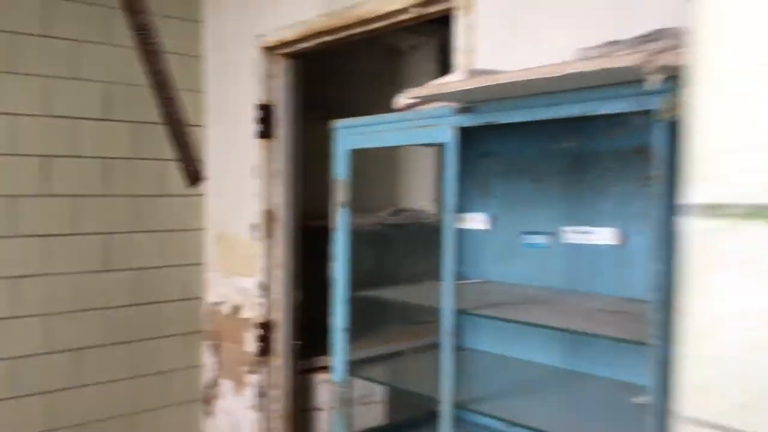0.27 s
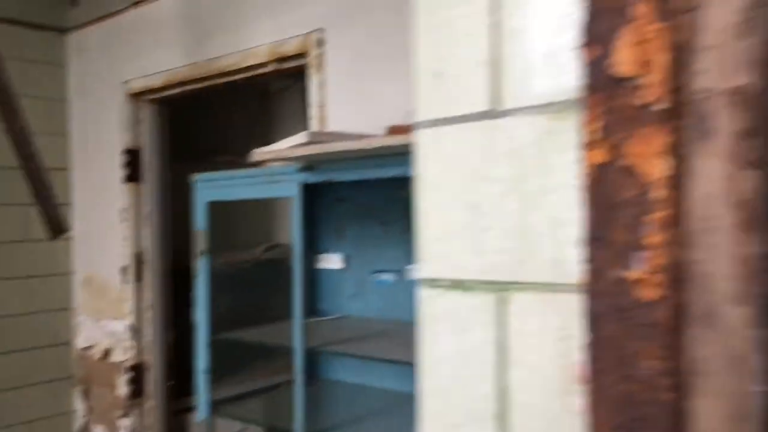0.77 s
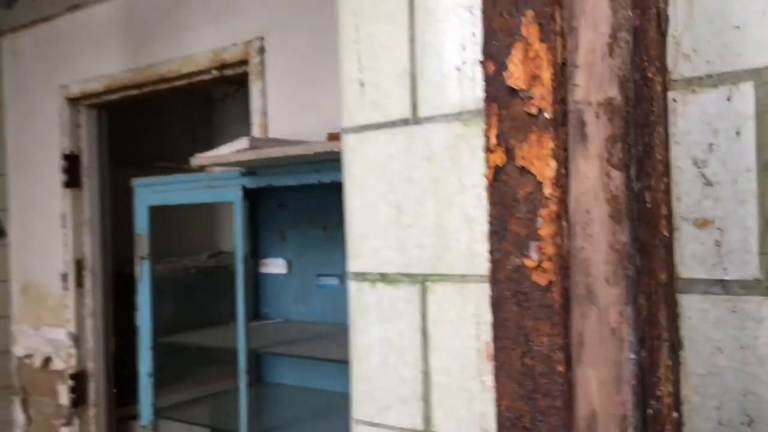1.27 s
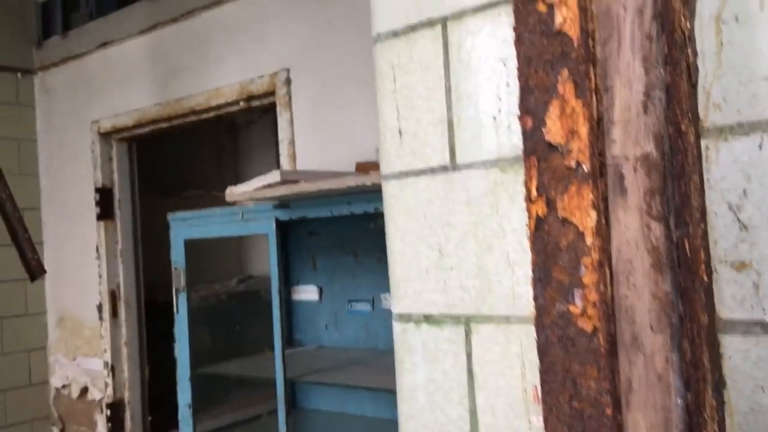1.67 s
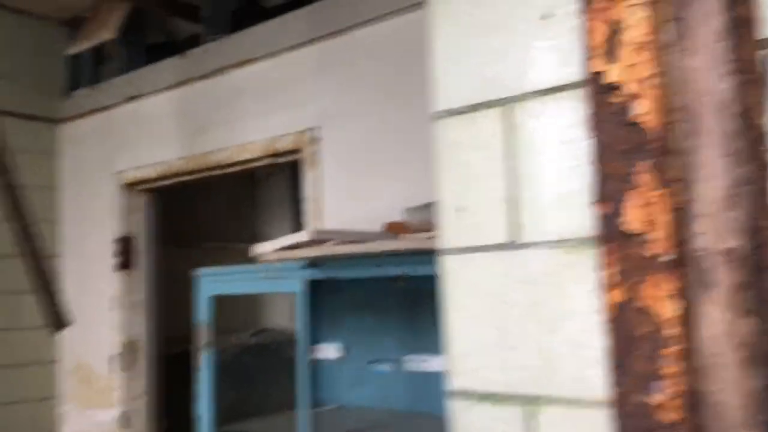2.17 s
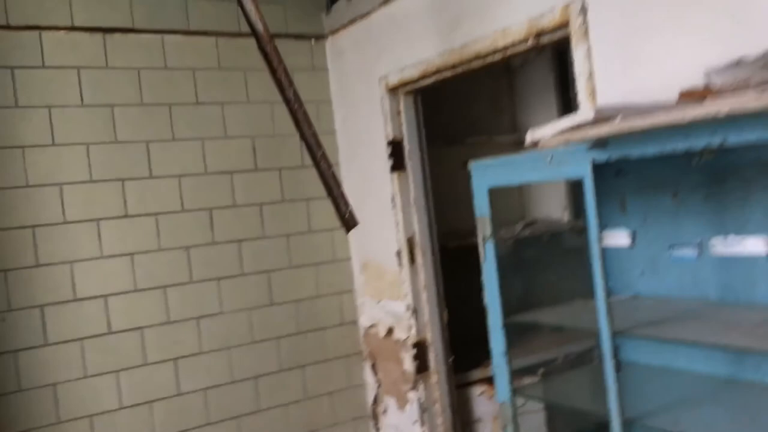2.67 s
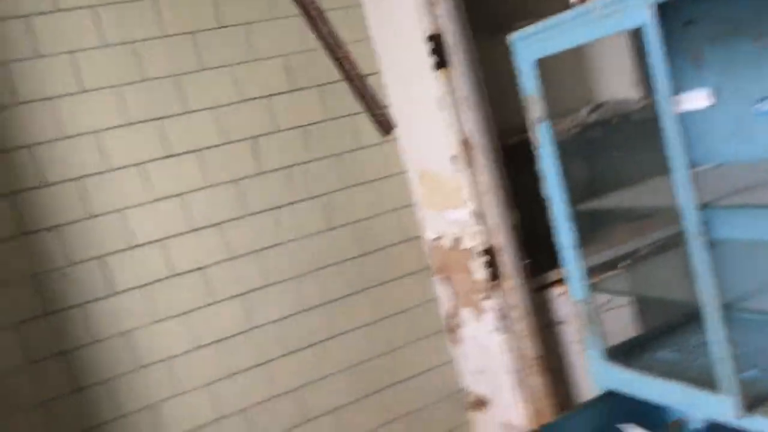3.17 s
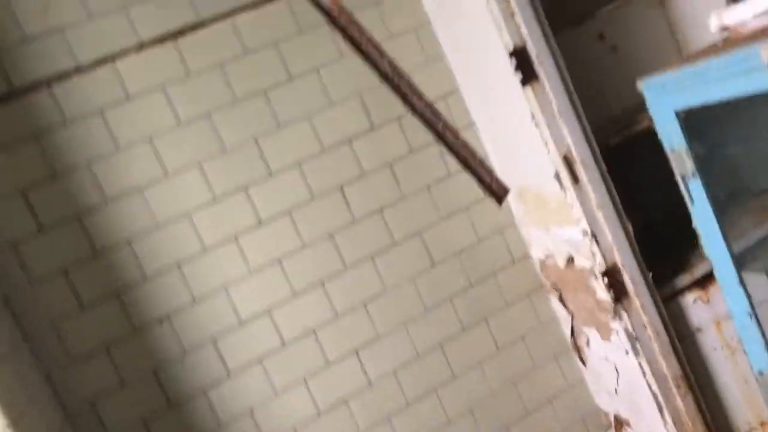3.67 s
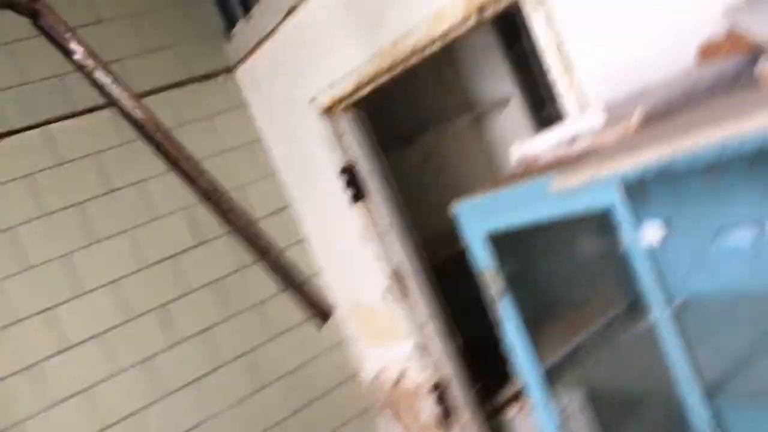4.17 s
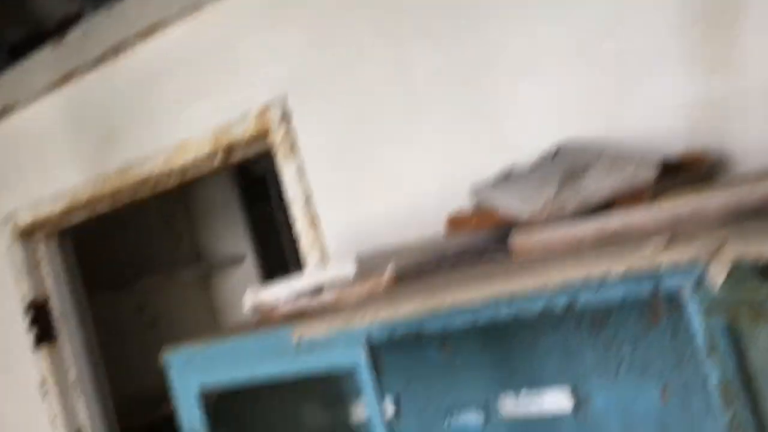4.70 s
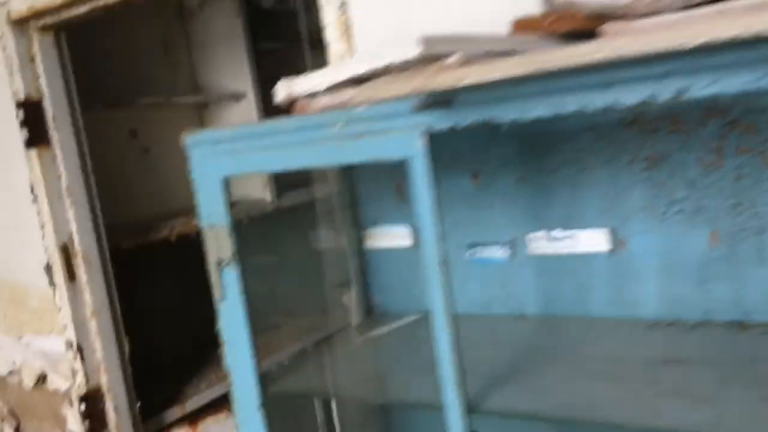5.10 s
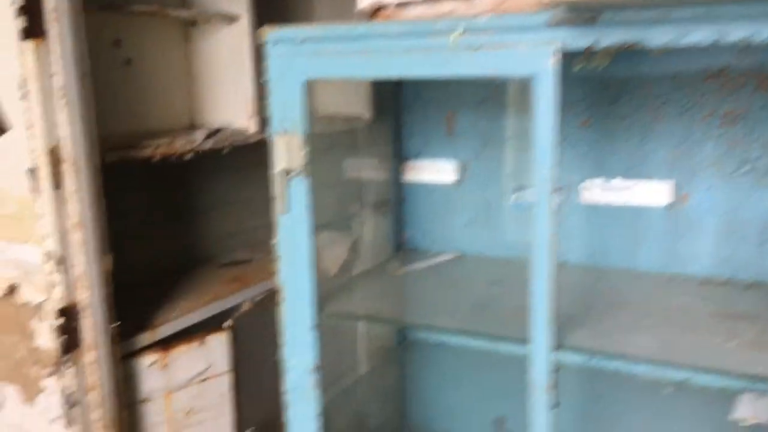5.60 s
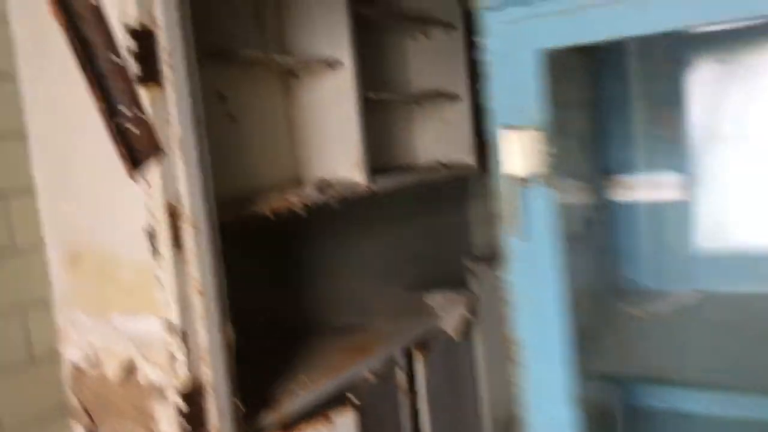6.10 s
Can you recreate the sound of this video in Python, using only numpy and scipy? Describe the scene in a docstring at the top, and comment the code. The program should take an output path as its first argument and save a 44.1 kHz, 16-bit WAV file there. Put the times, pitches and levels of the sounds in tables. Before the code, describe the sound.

A quiet, low room hush runs throughout, in a bare hard-walled room with a short, bright echo, heard by one close microphone. From 0 to 2.2 s there are only faint grit crackles, a small glassy tick near 0.3 s, and soft scuffs and dull bumps around 1.2-1.7 s. At about 2.4 s a firm step cracks sharply into rubble with grit dragging beneath. The loudest crunch comes at 2.7 s, a hard snap with a hollow knock. Small clinks follow, then a brittle, dusty crack at 3.4 s, a solid knock at 3.9 s, and a broader, grinding glass crunch at 4.2-4.45 s with several pieces settling. From 4.6 s the treading eases: fine crackles and scrapes around 5-5.2 s, a soft heel thud at 5.75 s, and last light crunches and scuffing near 6.1 s.

```python
"""Shoes move over broken glass and rubble in an empty tiled room, heard by one microphone.
A quiet room tone (shaped noise) runs throughout; light cracks and clinks open over it, made of
noise bursts through resonances plus a sine per shard. Soles then drag grit and dust (swelling noise),
and rubble and heels thud (decaying sines with noise puffs). The loudest steps fall between about 2.3 s
and 4.5 s, then the treading eases. Hard walls add a short noise tail to all but room tone and floor rumble."""
import sys
import numpy as np
from scipy import signal
from scipy.fft import rfft, irfft, next_fast_len
from scipy.io import wavfile

SR = 44100
rng = np.random.default_rng(int(sys.argv[2]) if len(sys.argv) > 2 else 0)


def dump_mix(stems):
    """Bounce the given channels to the path in sys.argv[1] as a 16-bit WAV at rate SR."""
    frames = np.atleast_2d(stems).T  # one column per channel
    limited = np.clip(frames, -1, 1)  # hard clip at full scale
    pcm = np.round(limited * 32767).astype(np.int16)
    wavfile.write(sys.argv[1], SR, pcm)


N = 279939


def amp(db):
    """Gain of a level in dB."""
    return 10 ** (np.asarray(db) / 20)


def unit(x):
    """x at rms 1."""
    return x / np.sqrt(np.mean(x ** 2) + 1e-20)


def along(points, hz):
    """Interpolate (f/Hz, value) points on a log frequency axis."""
    f, v = np.transpose(points)
    return np.interp(np.log(hz + 1), np.log(f + 1), v)


def filtered(x, response):
    """x times a complex response of frequency, zero-padded against wrap-around."""
    m = next_fast_len(x.shape[-1] + 8192)
    spectrum = rfft(x, m) * response(np.fft.rfftfreq(m, 1 / SR))
    return irfft(spectrum, m)[..., :x.shape[-1]]


def mode(f, hz, width_hz):
    """Response of one causal resonance, gain 1 at its centre."""
    return 1j * f * width_hz / (hz * hz - f * f + 1j * f * width_hz)


def grains(count, spread_db, smooth):
    """Noise whose loudness jumps from one tiny contact (smooth samples) to the next."""
    size = amp(spread_db * rng.standard_normal(count // smooth + 1))
    return rng.standard_normal(count) * np.repeat(size, smooth)[:count]


# room tone spectrum, relative: f/Hz, level/dB per Hz
TONE_SPECTRUM = [(13, -52.5), (22, 6), (49, 5), (170, -2.5), (359, -6), (717, -8.5), (779, -6.5),
                 (1830, -10.5), (2780, -16), (3870, -18.5), (4830, -22), (10200, -28), (15200, -26),
                 (16300, -40)]
TONE_RMS_DB = -59.5  # before the microphone response


def room_tone():
    """Steady hush of the building and the microphone: shaped stationary noise."""
    hush = filtered(rng.standard_normal(N), lambda f: amp(along(TONE_SPECTRUM, f)))
    return amp(TONE_RMS_DB) * unit(hush)


# decay of the tiled room: f/Hz, t60/s
WALL_DECAY = [(100, 0.59), (300, 0.29), (800, 0.24), (2000, 0.23), (5000, 0.26), (13000, 0.23)]


def walls(x, wet_db):
    """x plus a fresh noise tail from the tiles, each frequency dying at its own speed."""
    hz, t, z = signal.stft(rng.standard_normal(SR // 2), SR, nperseg=256)
    decay = amp(-60 * t / along(WALL_DECAY, hz)[:, None])
    tail = signal.istft(z * decay, SR, nperseg=256)[1]
    tail = np.pad(tail / np.linalg.norm(tail), (round(0.0029 * SR), 0))  # delay/s of the nearest wall
    return x + amp(wet_db) * signal.fftconvolve(x, tail)[:len(x)]


# loose panes and tiles that every crack rings: f/Hz, width/Hz, relative level/dB
RUBBLE_MODES = [(370, 120, -4), (661, 89, 0.5), (1137, 42, -0.5), (1369, 86, 5), (1576, 160, -5),
                (1955, 230, 3), (2130, 60, -34), (3784, 38, -0.5), (6260, 230, -35), (7020, 120, -6)]
# splinter treble, relative: f/Hz, level/dB per Hz
SPLINTER_SPECTRUM = [(2500, -22), (4500, 5), (8000, -2), (12000, -1.5), (16000, -5.5)]


def fracture_paths(f, hz, tilt):
    """Responses of rubble rattle, floor knock and splinter treble to one fracture force."""
    rubble = sum((-1) ** k * amp(db) * mode(f, centre_hz, width_hz)
                 for k, (centre_hz, width_hz, db) in enumerate(RUBBLE_MODES))
    rattle = (rubble + 0.67 * mode(f, 1700, 3540)) * mode(f, hz, 3.33 * hz)  # small shards rattle higher
    knock = (rubble + 0.34) * mode(f, 548, 1100) ** 2
    top_lift = (1 + (f / 11000) ** 4) ** tilt
    treble = amp(along(SPLINTER_SPECTRUM, f)) * mode(f, 9130, 16000) * top_lift
    return [rattle, knock, treble]


# glass and grit giving way under a sole:
# t/s, rattle level/dB, treble level/dB re rattle, shard f/Hz, crush t60/s, rise time constant/ms
CRUNCHES = [ (0.076, -51.5, -10, 1102, 0.14, 11), (0.253, -48, -30, 1106, 0.21, 7.2),
            (.287, -39, -9, 1597, 0.043, 1.8), (0.381, -50, -13, 1155, 0.12, 12),
            (0.796, -44.5, -11, 3174, 0.018, 1.2), (1.349, -48, -10.5, 1444, .1, 1.1),
            (1.47, -57.5, 17, 1370, 0.059, 4), (1.68, -47, -3, 1027, .21, 15),
            (2.1, -64, 6, 1190, 0.046, 1), (2.213, -46, -2.5, 1580, .13, 10),
            (2.34, -50.5, -3, 1370, 0.26, 1.5), (2.366, -22, -13, 1367, 0.1, 6),
            (2.387, -14.5, 2.5, 1360, 0.017, 0.18), (2.564, -30.5, -11.5, 2100, 0.16, 1.5),
            (2.698, -6, -1.5, 1550, 0.033, 1.5), (2.716, -13.5, -27.5, 1048, 0.053, 3),
            (2.943, -35.5, -17.5, 3230, .02, .7), (3.103, -50.5, -11, 1317, 0.123, 0.79),
            (3.201, -38, 1.5, 1120, 0.047, 2), (3.221, -36, 4.5, 3890, 0.026, 0.5),
            (3.328, -31.5, 3.5, 3670, .03, .5), (3.362, -15.5, 2, 1537, 0.019, 0.74),
            (3.377, -20, -0.5, 1420, .047, 0.56), (3.528, -37.5, -10, 1662, 0.35, 15),
            (3.592, -33.5, -18.5, 2070, 0.24, 8.8), (3.685, -35.5, -15, 1498, .2, 12),
            (3.908, -43, -6.5, 1538, .19, 0.76), (3.934, -25.5, 0, 963, 0.14, 0.67),
            (3.949, -24, -27.5, 1172, 0.084, 0.74), (4.036, -27.5, 0, 1354, 0.086, 0.79),
            (4.196, -20.5, 2, 1310, .037, 1.6), (4.203, -20.5, -34, 1333, 0.035, 1.9),
            (4.285, -35.5, -22, 1804, 0.2, 7.2), (4.3, -28, -7.5, 2000, 0.19, 2.5),
            (4.338, -8.5, -3, 2194, 0.065, 12.8), (4.358, -17, -20, 1442, 0.039, 3.7),
            (4.431, -26, -3.5, 2622, 0.056, 1.1), (4.446, -23.5, -10, 3096, 0.11, 4),
            (4.695, -47, -4, 2820, .13, 16), (4.872, -52, 3, 2814, 0.15, 2.1),
            (4.977, -37.5, -7.5, 2490, 0.3, 18), (5.047, -35, -8, 2930, 0.19, 10),
            (5.131, -31, -2.5, 2530, 0.039, 1.8), (5.23, -46, -25, 985, 0.069, 9.5),
            (5.39, -60.5, 11, 2400, .05, 2), (5.467, -47, -9.5, 1210, 0.32, 19),
            (5.669, -60.5, 8.5, 1200, .05, 1.2), (5.755, -56, -21, 574, 0.29, 2.5),
            (6.061, -42, 0, 1054, 0.16, .76), (6.104, -36, -31, 1723, 0.039, 1.3),
            (6.187, -39, -16, 2560, .07, 8.3)]
KNOCK_DB, KNOCK_LOSS_DB = -12, 12  # re rattle at 1 ms rise; loss per tenfold slower rise
BRIGHTER_PER_DB = 0.05  # top-treble exponent per dB of fracture force
CLINK_DB, CLINK_LOSS_DB = 0.5, 5.5  # re rattle at 0.12 s crush, -8.5 dB treble; loss per tenfold longer
CLINK_LOSS_PER_TREBLE_DB = 0.2  # a shard that splinters rings less


def crunches():
    """Splinter bursts rattle the rubble, knock the floor, spit treble and set one shard clinking."""
    out, t = np.zeros(N + SR), np.arange(SR // 2) / SR
    for start_s, db, treble_db, hz, crush_s, rise_ms in CRUNCHES:
        knock_db = KNOCK_DB - KNOCK_LOSS_DB * np.log10(rise_ms)
        tilt = BRIGHTER_PER_DB * (db + knock_db + 32)  # hard, sudden fractures reach higher

        onset = (1 - np.exp(-1000 * t / rise_ms)) ** 2
        press = amp(-60 * (t / crush_s) ** 1.193)  # the sole keeps pressing before the heap gives way
        force = onset * (press + 0.58 * amp(-60 * t / 0.0048))  # the first fracture is the hardest

        burst = grains(len(t), spread_db=2.5, smooth=70) * force
        parts = filtered(burst, lambda f: fracture_paths(f, hz, tilt))
        # each part gets the energy of the force
        rattle, knock, treble = parts * np.linalg.norm(force) / np.linalg.norm(parts, axis=1)[:, None]

        waver = np.cumsum(rng.normal(0, 8e-5 * hz, len(t)))  # phase/rad: a cracked shard holds pitch loosely
        clink = onset * press * np.sin(2 * np.pi * hz * t + waver)
        clink_db = CLINK_DB - CLINK_LOSS_PER_TREBLE_DB * (treble_db + 8.5)
        clink_db -= CLINK_LOSS_DB * np.log10(crush_s / 0.12)

        crack = rattle + amp(knock_db) * knock + amp(treble_db) * treble + amp(clink_db) * clink
        out[round(start_s * SR):][:len(t)] += amp(db) * walls(crack, wet_db=-2.5)
    return out[:N]


# strokes of a dragged sole:
# t/s, length/s, grit level/dB, floor weight level/dB, fine dust level/dB, grit f/Hz
SCRAPES = [ (0.127, .55, -66, -70, -65, 1300), (1.135, 0.4, -61, -56, -66, 798),
           (1.269, 0.42, -54, -59.5, -63, 1055), (1.502, 0.49, -64.5, -65.5, -57.5, 1000),
           (1.862, 0.45, -65, -58.5, -64.5, 1080), (2.218, .14, -56, -49, -80, 690),
           (2.323, 0.33, -39.5, -38.5, -50, 960), (2.535, 0.31, -42.5, -38.5, -62.5, 1256),
           (2.676, 0.24, -40.5, -52, -77, 1060), (2.887, 0.21, -50.5, -47.5, -71, 1177),
           (3.137, 0.38, -52.5, -54, -65, 1390), (3.35, 0.17, -41.5, -61, -35.5, 996),
           (3.509, 0.37, -48, -47.5, -48.5, 1576), (3.746, 0.54, -58, -58, -68, 900),
           (3.924, 0.36, -49, -55.5, -58, 910), (4.218, 0.45, -56, -62, -45.5, 1487),
           (4.352, 0.32, -43, -44, -54, 1760), (4.58, 0.35, -69, -57.5, -56.5, 1500),
           (4.946, 0.34, -58.5, -55.5, -53, 2300), (5.166, 0.28, -51, -56.5, -62, 1080),
           (5.369, 0.4, -54.5, -57.5, -61, 1050), (5.64, 0.25, -68.5, -57, -71, 930),
           (5.712, 0.41, -56.5, -52.5, -63, 750), (6.046, 0.29, -54.5, -52, -60, 1500)]
PRESS_SKEW, PRESS_SHARP = 0.61, 1.47  # skew < 1 peaks before mid-stroke; sharp points the swell


def pressure(t):
    """How hard each stroke presses at times t, 0 to 1: it swells and lets go."""
    start_s, length_s = np.transpose(SCRAPES)[:2, :, None]
    progress = np.clip((t - start_s) / length_s, 0, 1)
    return np.abs(np.sin(np.pi * progress ** PRESS_SKEW)) ** PRESS_SHARP


# grit spectrum for a 1500 Hz stroke, relative: f/Hz, level/dB per Hz
GRIT_SPECTRUM = [(200, -56), (600, 5), (1500, 2.5), (3000, -4), (5000, -14.5), (9000, -36)]
# fine dust spectrum, relative: f/Hz, level/dB per Hz
DUST_SPECTRUM = [(2060, -4.5), (3500, -4), (4920, -6), (5860, -5.5), (8900, -7), (10300, -5),
                 (12800, -13.5), (15300, -4.5), (16300, -30)]
# rumble of the weight in the floor, relative: f/Hz, level/dB per Hz
WEIGHT_SPECTRUM = [(20, -19), (40, -2.5), (70, -15.5), (130, -7), (220, -4.5), (500, -15.5), (800, -23.5),
                   (1200, -48)]


def drag():
    """Grit rolls under the sole at each stroke's pitch, dust hisses, the weight rumbles in the floor."""
    *levels_db, pitch_hz = np.transpose(SCRAPES)[2:]
    grit_gain, weight_gain, dust_gain = amp(levels_db) @ pressure(np.arange(N) / SR)
    rub = grains(N, spread_db=3.0, smooth=120)

    hz, t, z = signal.stft(rub, SR, nperseg=512)
    share = amp(levels_db[0])[:, None] * (pressure(t) + 1e-6)
    shift = 1500 * share.sum(0) / (pitch_hz @ share)  # finer grit moves the whole spectrum up
    shape = amp(along(GRIT_SPECTRUM, hz[:, None] * shift))
    shape = shape / np.sqrt(np.mean(shape ** 2, axis=0))
    grit = signal.istft(z * shape, SR, nperseg=512)[1][:N]

    dust = filtered(rub, lambda f: amp(along(DUST_SPECTRUM, f)))
    weight_noise = grains(N, spread_db=3.0, smooth=900)
    weight = filtered(weight_noise, lambda f: amp(along(WEIGHT_SPECTRUM, f)))

    near = grit_gain * unit(grit) + dust_gain * unit(dust)
    return walls(near, wet_db=-8.0) + weight_gain * unit(weight)


# rubble and heels landing, a heavy step sounding several pieces at once: t/s, level/dB, f/Hz, t60/s
THUDS = [ (.799, -52, 800, .06), (1.18, -48, 650, .14), (1.263, -42, 133, .25), (1.33, -41.5, 185, 0.13),
         (1.396, -43, 124, 0.21), (1.528, -48, 58.5, 0.28), (1.687, -42.5, 375, 0.15),
         (1.729, -42, 600, 0.095), (2.241, -47.5, 55, .25), (2.348, -33, 72, 0.29),
         (2.384, -21.5, 708, 0.24), (2.386, -24, 262, 0.14), (2.573, -32, 258, 0.18),
         (2.7, -10, 733, 0.085), (2.7, -20.5, 223, 0.13), (2.704, -23.5, 113.6, 0.097),
         (2.746, -41, 60, .3), (2.759, -36, 253, .14), (2.938, -37, 420, 0.12), (3.102, -41, 423, 0.12),
         (3.364, -25.5, 423, 0.076), (3.371, -33.5, 190, .15), (3.381, -29, 428, 0.068),
         (3.416, -20.5, 400, 0.093), (3.935, -21.5, 218, 0.084), (3.938, -9, 657, 0.043),
         (4.036, -30.5, 349, 0.14), (4.218, -30, 646, 0.08), (4.233, -31, 200, 0.18),
         (4.398, -29, 166, .09), (4.431, -30.5, 508, 0.16), (4.46, -30.5, 209, 0.17),
         (5.135, -49, 210, 0.12), (5.527, -43.5, 175, 0.19), (5.752, -34, 160, 0.15),
         (5.753, -36, 314, 0.16), (5.755, -40, 668, 0.086), (5.87, -49, 173, .17), (6.069, -43, 195, .08)]
PUFF_WIDTH = 1.3  # re pitch


def thuds():
    """A soft landing: a low noise puff round one dull decaying note."""
    out, t = np.zeros(N + SR), np.arange(SR // 2) / SR
    for start_s, db, hz, t60_s in THUDS:
        fall = amp(-60 * t / t60_s) * (1 - np.exp(-t / 0.00092))
        puff = unit(filtered(rng.standard_normal(len(t)), lambda f: mode(f, hz, PUFF_WIDTH * hz) ** 2))
        note = np.sin(2 * np.pi * hz * t)
        landing = fall * (0.9 * note + 0.77 * puff)
        out[round(start_s * SR):][:len(t)] += amp(db) * walls(landing, wet_db=-4.0)
    return out[:N]


def scene():
    """All sources summed at one microphone."""
    return (room_tone() + crunches() + drag() + thuds())[None]


# microphone response: f/Hz, level/dB
MICROPHONE_RESPONSE = [(20, -31.5), (45, -2), (4300, -1), (4900, -5.5), (5600, -0.5), (9300, -1.5),
                       (10300, -8), (11500, -2.5), (16000, -8.5)]
TOP_HZ = 16200


def record(dry):
    """The input stage rounds off the loudest peaks; the microphone has its dips and a band limit."""
    rounded = dry / (1 + np.abs(dry / 1.3) ** 4) ** (1 / 4)
    return filtered(rounded, lambda f: amp(along(MICROPHONE_RESPONSE, f)) * (f < TOP_HZ))


dry = scene()
out = record(dry)
dump_mix(out)
```